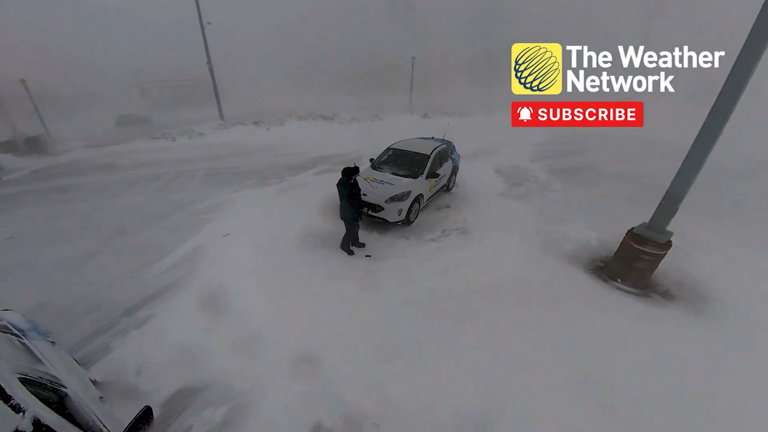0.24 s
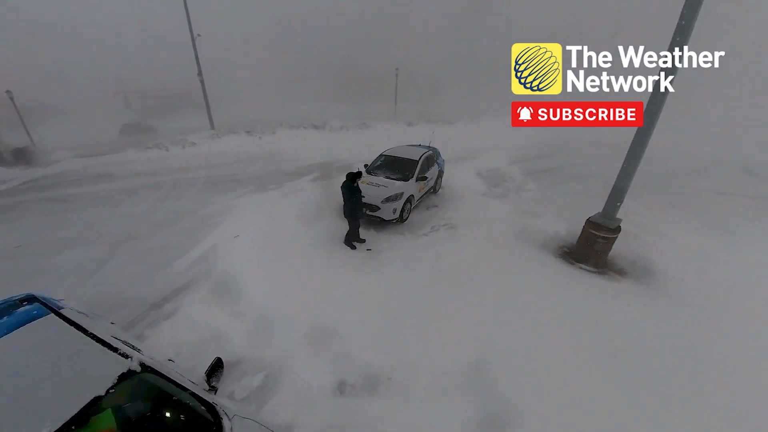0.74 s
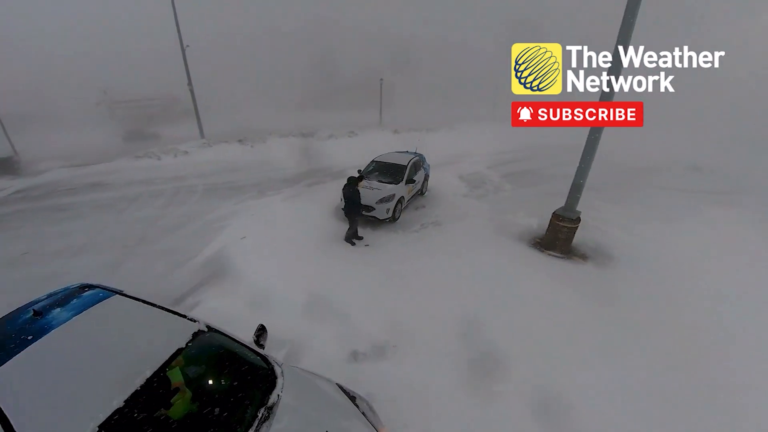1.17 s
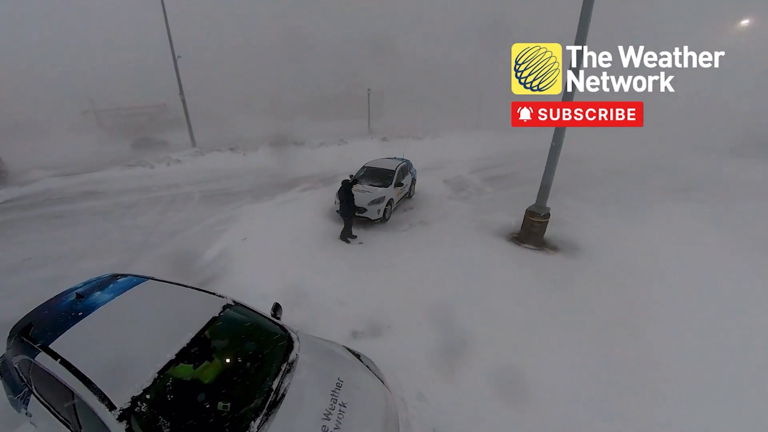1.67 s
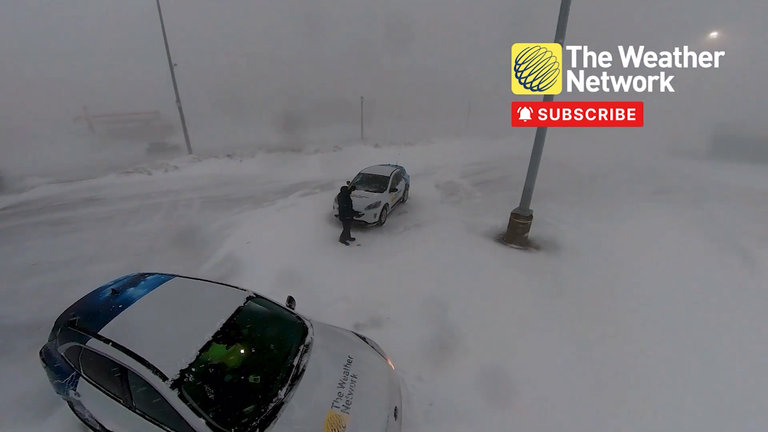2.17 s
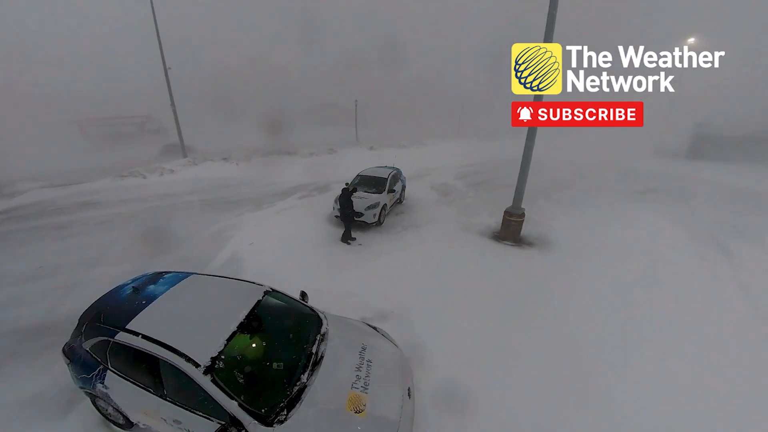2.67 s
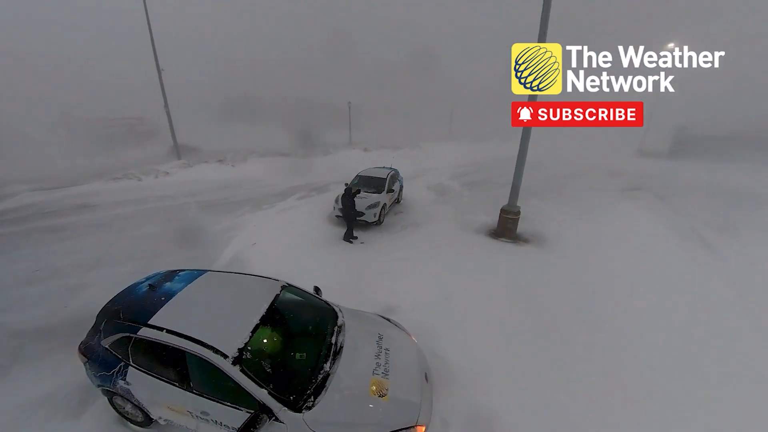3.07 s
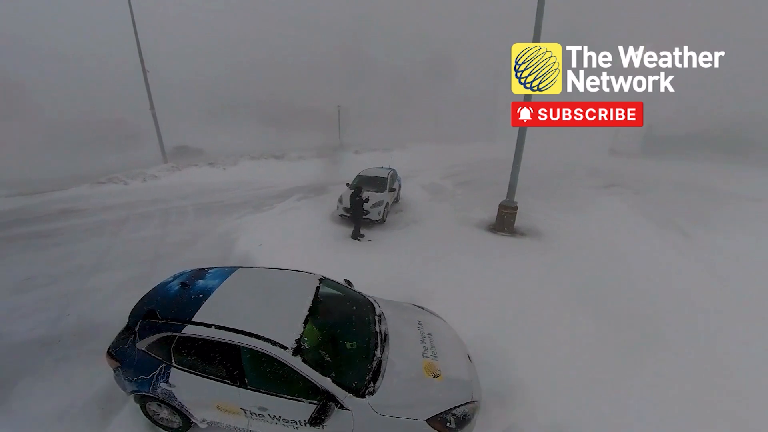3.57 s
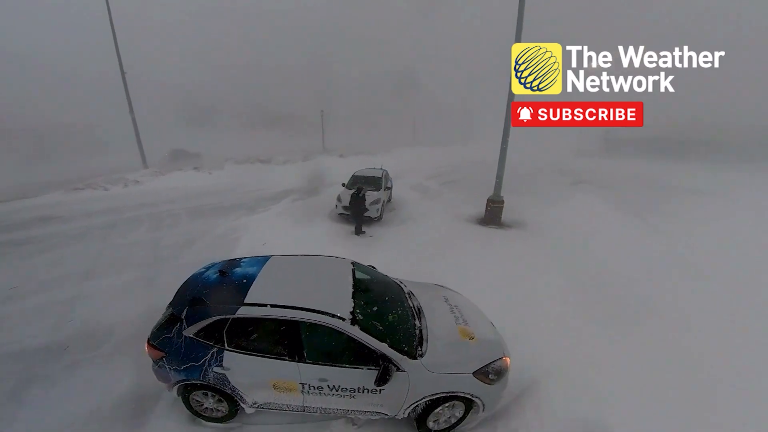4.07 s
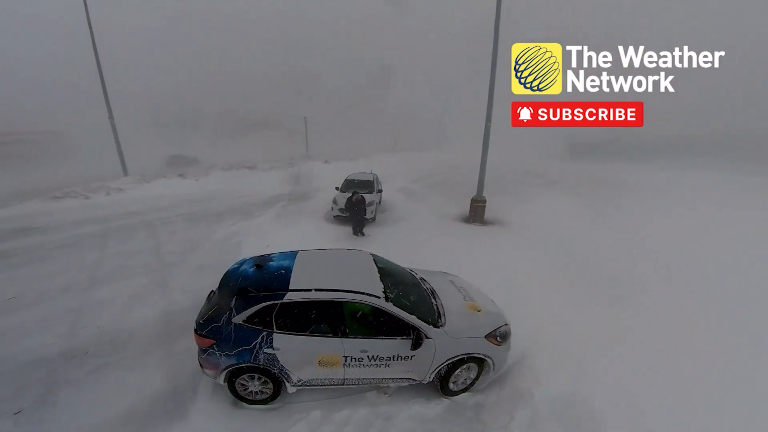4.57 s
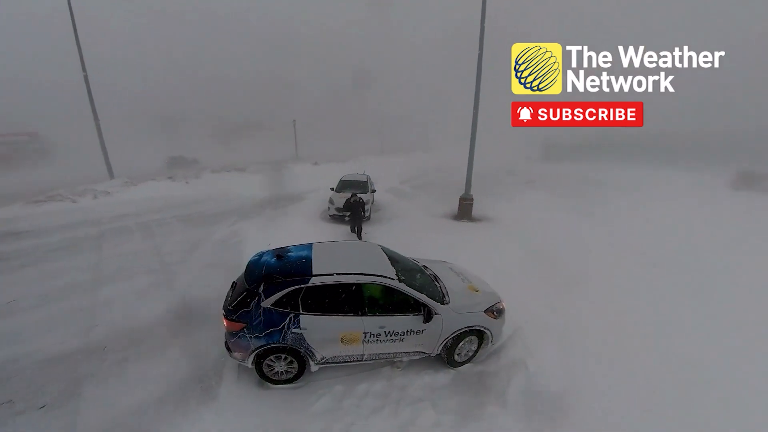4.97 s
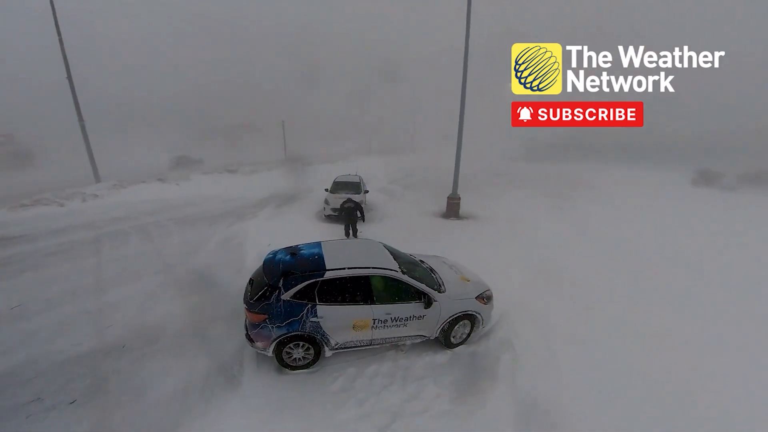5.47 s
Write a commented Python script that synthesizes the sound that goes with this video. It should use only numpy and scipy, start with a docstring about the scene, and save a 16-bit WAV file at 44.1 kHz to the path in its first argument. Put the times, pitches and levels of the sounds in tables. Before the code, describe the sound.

A blizzard over an open, snowy car park, heard from a small camera on a pole for about 5.7 seconds. Close and central, wind buffets the covered port: a deep, lumpy rumble with thuds and flaps, rising and dropping several times a second. Behind it a softer mid-low storm roar stays even and wide. A faint low hum near 90 Hz wavers, clearest around 0.5 s, returning weakly near 3 s and then practically gone. Snow grains tick brightly on the ringing housing, noticeable near 0.6, 2.3 and 2.5 s, over fine sparse patter. Blunt pops punctuate, strong around 0.5-0.6, 1.1-1.2, 2.25-2.3 and 3.4-3.7 s. From about 3.85 to 4.15 s rough puffs cluster, then more come at 4.5-4.9 s, with lower, heavier ones near 5.25-5.35 s. Ragged gusts continue to the end, with a strong surge near 5.45 s. Dull top, only a trace of hiss.

```python
"""An open car park in a blizzard, heard at a small camera on a pole.
The storm roars evenly from all around: bands of noise, partly alike on the left and right.
Something hums in the airstream, a wavering tone, and blown snow ticks on the ringing housing.
Small vortices puff across the microphone port as short noise bursts, and eddies burst as pressure pops.
Nearest of all, eddies of four sizes buffet the port: noises whose levels swell into a lumpy rumble."""
import sys
import numpy as np
from scipy import signal
from scipy.fft import rfft, irfft, next_fast_len
from scipy.io import wavfile
from scipy.ndimage import uniform_filter1d

SR = 44100
rng = np.random.default_rng(int(sys.argv[2]) if len(sys.argv) > 2 else 0)


def generate_wav(signal):
    """Clip the signal to [-1, 1] and save it as 16-bit WAV at the path in sys.argv[1]."""
    frames = np.transpose(np.atleast_2d(signal))
    scaled = np.clip(frames, -1, 1) * 32767
    pcm = np.round(scaled).astype(np.int16)
    wavfile.write(sys.argv[1], SR, pcm)


N = 252252   # length in samples


def from_db(db):
    """Turn a level in dB into a gain."""
    return np.exp(np.asarray(db) * (np.log(10) / 20))


def rms_one(x):
    """Scale a sound to an rms level of 1."""
    return x / np.sqrt(np.mean(x ** 2) + 1e-20)


def in_time(rows):
    """Read the columns of a table, time first, at every sample with straight lines between rows."""
    times, *columns = np.transpose(rows)
    return [np.interp(np.arange(N) / SR, times, column) for column in columns]


def at_hz(points, hz):
    """Read a table over frequency with straight lines on a log-frequency axis."""
    table_hz, values = np.array(points).T[:2]
    return np.interp(np.log(hz), np.log(table_hz), values)


def drift(rate_hz):
    """Slow random wandering of rms 1: noise smoothed twice by a one-pole low-pass."""
    step = 40   # computed at every 40th sample only
    r = np.exp(-2 * np.pi * rate_hz * step / SR)
    noise = rng.standard_normal(N // step + 2002)
    slow = signal.lfilter([1], [1, -2 * r, r * r], noise)[2000:]   # skip the filter's start-up
    return np.interp(np.arange(N) / step, np.arange(len(slow)), rms_one(slow))


def coloured(spectrum):
    """Noise of rms 1 with the given spectrum, falling 24 dB per octave more beyond its ends."""
    size = next_fast_len(N)
    hz = np.maximum(np.arange(size // 2 + 1) * SR / size, 1)
    lowest_hz, highest_hz = spectrum[0][0], spectrum[-1][0]
    beyond = np.maximum(np.maximum(lowest_hz / hz, hz / highest_hz), 1)
    gain = from_db(at_hz(spectrum, hz) - 24 * np.log2(beyond))
    return rms_one(irfft(rfft(rng.standard_normal(size)) * gain, size)[:N])


def steadied(x, share, span_ms):
    """Take part of the chance swell out of a narrow noise, so that it rolls evenly."""
    envelope = np.abs(signal.hilbert(x, next_fast_len(N))[:N])
    swell = uniform_filter1d(envelope, int(span_ms * SR / 1000))
    return rms_one(x / (swell + 0.16) ** np.clip(share, 0, 1))


def resonance(x, hz, width_hz):
    """Ring at one frequency: a two-pole peak of gain 1."""
    r = np.exp(-np.pi * width_hz / SR)
    b = np.array([1, 0, -1]) * (1 - r * r) / 2
    return signal.lfilter(b, [1, -2 * r * np.cos(2 * np.pi * hz / SR), r * r], x)


def filtered(order, hz, kind, x):
    """Pass a sound through a Butterworth filter."""
    return signal.sosfilt(signal.butter(order, hz, kind, fs=SR, output="sos"), x)


# Colour of the far wind: pitch_hz, relative level_db (per Hz)
ROAR_SPECTRUM = [(35, -42), (60, -26), (100, -22), (161, -9), (285, -2), (400, -3), (560, -6.5),
                 (1100, -14.5), (2180, -23.5), (3100, -32), (3970, -39.5), (4600, -47.5), (5400, -54),
                 (7000, -61.5), (9500, -95.5)]
# How alike left and right are: pitch_hz, likeness (1 the same, 0 unrelated, -1 opposite)
LEFT_RIGHT_LIKENESS = [(40, -0.6), (65, 0.36), (100, 0.94), (250, 0.6), (500, 0.58), (1000, 0.71),
                       (2000, 0.73), (4000, 0.72), (8000, 0.41)]


def roar(patchy_db, level_db):
    """Wind over ground and cars, from afar: narrow bands, each partly alike at both ports."""
    out = 0
    edges = 30 * 2 ** np.arange(0, 8.4, 1 / 5)   # five bands per octave, from 30 Hz
    white = rng.standard_normal((2, 2, N))
    together = drift(3.5)   # level wandering shared by all bands
    for k, (low, high) in enumerate(zip(edges, edges[1:])):
        # neighbouring bands take turns at two noise pairs
        mid, side = filtered(3, [low, high], "band", white[k % 2])
        hz = np.sqrt(low * high)
        alike = np.clip(at_hz(LEFT_RIGHT_LIKENESS, hz), -1, 1)
        gain = from_db(at_hz(ROAR_SPECTRUM, hz) + patchy_db * (1.1 * together + drift(21.0)))
        opposite = side * [[1], [-1]]
        out = out + gain * (np.sqrt(1 + alike) * mid + np.sqrt(1 - alike) * opposite)
    return from_db(level_db) * rms_one(out)


# Course of the low hum, before its waver: start_s, pitch_hz, level_db
HUM_COURSE = [(0, 95.44, -45.5), (.3, 95.09, -37), (.5, 96.4, -31), (.7, 94.72, -38), (1.1, 92.35, -37.5),
              (1.5, 89.14, -47), (2.2, 94.8, -43), (2.9, 88.75, -37.5), (3.5, 86.3, -58), (5.72, 86.5, -56)]


def hum(octave_db, waver_hz):
    """A tone in the airstream with its octave, both wavering at random in pitch and level."""
    hz, level_db = in_time(HUM_COURSE)
    phase = 2 * np.pi * np.cumsum(hz + waver_hz * drift(9.0)) / SR
    octave = from_db(octave_db + 1.0 * drift(22.0)) * np.sin(2 * phase)
    return from_db(level_db + 3.5 * drift(21.0)) * (np.sin(phase) + octave)


# Large snow grains: start_s, level_db (before the ring), brightness_db (upper rings against lower)
LARGE_GRAINS = [(0.0732, -62, 5), (0.093, -65, 4), (0.318, -58.5, -3), (0.327, -61, 3), (0.575, -47.5, -2),
                (0.615, -57.5, 9.5), (1.1119, -60, -2), (1.1134, -70, 8), (1.2117, -56, -1),
                (1.2143, -60, 11.5), (1.31, -75, -14), (1.477, -70, 0), (1.499, -69, -8), (1.5416, -67, 0),
                (1.5722, -66, 6), (1.6392, -66, 4), (1.673, -69, -7), (1.7591, -65, 0), (1.902, -75, -5),
                (2.015, -73, -14.5), (2.2538, -63, 3), (2.295, -55, 0), (2.3196, -51.5, 2.5),
                (2.4645, -62, -2), (2.5399, -49.5, -0.5), (2.8846, -65.5, 11), (3.108, -69, 0),
                (3.336, -66, 4), (3.368, -57.5, 3), (3.5688, -69, 4), (3.6622, -65, 5.5), (3.71, -61, -4),
                (3.725, -59, 0), (4.082, -56.5, 10), (4.2433, -62, 4), (4.69, -71, -3), (4.7581, -58, 6),
                (5.41, -68, 3)]
# Rings of the housing: pitch_hz, width_hz, level_db, share of a grain's brightness (may be negative)
HOUSING_RINGS = [(2920, 1300, 6.5, -1.8), (5900, 1500, -1, -0.74), (6560, 1500, 0, 1)]


def snow(fine_per_s, fine_db):
    """Large grains scratch the ringing housing for 1 ms; fine grains patter as single clicks."""
    start_s, level_db, bright_db = np.transpose(LARGE_GRAINS)
    length = 40   # samples in a scratch
    grit = 0.23 * rng.standard_normal((len(LARGE_GRAINS), length)) * np.hanning(length)
    grit[:, 12] += 2   # the first contact
    grit = grit / grit.std(axis=1, keepdims=True)
    where = (start_s * SR).astype(int)[:, None] + np.arange(length)

    sizes = from_db(fine_db + 2.4 * np.minimum(rng.exponential(1, N), 3.0)) * rng.choice([-1, 1], N)
    fine = sizes * (rng.random(N) < fine_per_s / SR) + 1e-18
    out = 0
    for hz, width_hz, ring_db, share in HOUSING_RINGS:
        hits = fine.copy()
        hits[where] += from_db(level_db + share * bright_db)[:, None] * grit
        out = out + from_db(ring_db) * resonance(resonance(hits, hz, width_hz), hz, width_hz)
    return out


# Short rough puffs: time_s (a quarter of the way into the puff), peak level_db, centre pitch_hz
PUFF_LIST = [(0.151, -32, 400), (1.305, -36.5, 443), (2.366, -32, 423), (3.846, -38, 320),
             (3.867, -43, 386), (3.883, -31, 440), (3.89, -38, 860), (3.958, -32, 550), (3.992, -40, 700),
             (4.012, -37, 795), (4.02, -44, 890), (4.053, -50, 1380), (4.098, -46, 1000), (4.068, -37, 774),
             (4.084, -43, 1000), (4.124, -40.5, 800), (4.136, -41, 351), (4.035, -40, 923),
             (4.543, -48, 480), (4.563, -31.5, 376), (4.642, -31.5, 332), (4.652, -28, 425),
             (4.656, -38.5, 934), (4.718, -35.5, 244), (4.827, -41, 512), (4.845, -31, 349),
             (4.879, -44, 865), (5.25, -26.5, 272), (5.328, -24, 211.6), (5.599, -31.5, 422),
             (5.669, -52, 368)]


def puffs(base_ms, cycles):
    """A few uneven, dull cycles where a small vortex is dragged across the port."""
    out = np.zeros(N + 4000)
    white = rng.standard_normal((len(PUFF_LIST), 4000))
    for (time_s, level_db, hz), noise in zip(PUFF_LIST, white):
        length_ms = np.clip(base_ms + cycles * 1000 / hz, 4, 40)   # lower puffs last longer
        size = int(length_ms * SR / 1000)
        dull = filtered(4, 1.14 * hz, "low", noise)
        band = resonance(resonance(dull, hz, hz), hz, hz)   # each peak is as wide as its centre pitch
        burst = band[-size:] * np.hanning(size)
        start = int(time_s * SR - 0.2494 * size)
        out[start:start + size] += from_db(level_db) * burst / np.abs(burst).max()
    return out[:N]


def pulses(rows):
    """Pressure humps from rows: time_s, height (gain), half width_ms, suction, rebound."""
    before, length = 400, 1200   # samples ahead of the push, and in all
    out = np.zeros(N + length)
    ms = np.arange(-before, length - before) / SR * 1000
    taper = signal.windows.tukey(length, .4)
    after = np.maximum(ms, 0)
    # the air in the port swings back at 85 Hz, setting in softly
    swing = -np.sin(2 * np.pi * 85.0 * after / 1000) * np.exp(-after / 7.0)
    swing = swing * (1 - np.exp(-(after / 2.5) ** 2))
    for time_s, height, width_ms, suction, rebound in rows:
        width_ms = np.clip(width_ms, .08, 2)
        push = (1 + (ms / width_ms) ** 2 / 2) ** -1.6
        dip = (1 + (ms / width_ms + 3.52) ** 2 / 2) ** -1.6   # suction just ahead of the push
        shape = push - np.clip(suction, 0, 1.5) * dip + np.clip(rebound, 0, 6) * swing
        start = int(np.clip(time_s * SR, 0, N - 1))
        out[start:start + length] += height * taper * shape
    return out[before:N + before]


# Strong pops: time_s of the push, level_db of the push before the cover softens it,
# half width_ms (at least 0.08 is used), suction ahead (0 to 1.5),
# slow rebound (limited to 0 to 6, so below 0 means none), housing knock_db against the push
STRONG_POPS = [(0.319, -37, .09, 0, 2.5, -4), (0.3278, -30.5, 0.044, 0, -2.5, -17),
               (0.37, -40.5, 0.069, 0, -2, -13), (0.154, -34, 0.31, 0.3, 0.5, -13),
               (.517, -21, 0.12, 0, 2, -23), (0.575, -18.5, 0.13, 0.1, -1.5, -17),
               (0.6152, -28, 0.12, 0, -1, -1), (0.6464, -34, 0.14, 0.1, 1.5, -5),
               (1.092, -33, 0.2, 1.5, -1.5, -8), (1.11275, -25, 0.18, 0, 0, 8),
               (1.1144, -21.5, 0.155, 1.5, 0, -5.5), (1.2153, -20, 0.23, 1.12, 0, 0),
               (2.5405, -21.5, 0.29, 0, 1, -8), (2.5424, -32, 0.35, 1.5, 0, -25),
               (1.2116, -37, 0.062, 0.4, 10, -9), (1.641, -31, 0.05, 1.07, -6, -13),
               (1.6445, -23, 0.14, 0.1, -2, -18), (2.051, -33, 0.18, 0.8, -2, -9),
               (2.243, -19, 0.3, 0, 0.5, -12), (2.275, -35, 0.13, 0.3, -1.5, -2),
               (2.2955, -15.5, 0.17, 0.02, 0.9, -15), (3.3681, -22, 0.32, 0.35, 3.5, -6),
               (3.573, -21.5, 0.28, 0, -2.5, -18), (3.6662, -21.5, 0.23, 0, 1.7, -22),
               (3.724, -21.5, 0.33, 0.66, 2.5, -10), (3.7997, -29, 0.24, 0.5, -1.5, -8),
               (3.872, -23, 0.37, 1, 1.5, -14), (3.96, -33, 0.35, 0.9, 7, -7),
               (4.424, -27, 0.3, 0.9, 2, -11.5), (4.479, -24.5, 0.56, 1.3, -1.5, -6),
               (4.519, -30, 0.35, 1.3, 0, -15), (4.569, -27, 0.3, 1.3, 0.5, -10),
               (4.7595, -25, 0.3, 0.1, 1.5, -12), (4.658, -27.5, 0.5, 0.86, 1.5, -13),
               (4.71, -20, 0.4, 0, 1, -3), (5.062, -23, 0.45, 0, -1, -13), (5.292, -31, 0.52, 1.34, 0, -13),
               (5.3949, -30.5, 0.33, 1.1, 5, -12), (5.603, -33.5, 0.43, 0.1, 4.5, -15),
               (5.669, -30, 0.44, 0, 3, -8)]


def pops(small_per_s, small_db):
    """Eddies bursting right at the port: the strong ones listed, many weak ones by chance."""
    knock_lag_ms = 0.6   # the housing answers this late
    strong, knocks = [], []
    for time_s, level_db, width_ms, suction, rebound, knock_db in STRONG_POPS:
        strong.append((time_s, from_db(level_db), width_ms, suction, rebound))
        knocks.append((time_s + knock_lag_ms / 1000, from_db(level_db + knock_db), width_ms, suction, 0))

    luck = rng.random((400, 6))
    times = np.cumsum(-np.log(luck[:, 0])) / small_per_s   # random waits between weak pops
    direction = np.where(luck[:, 4] < .7, 1, -1)   # most push, some pull
    heights = from_db(small_db - 0.86 * np.log(luck[:, 1] + .02)) * direction
    widths_ms = 0.065 + 1.7 * luck[:, 2]
    weak = np.transpose([times, heights, widths_ms, luck[:, 3], luck[:, 5]])[times < N / SR]

    pressure = pulses(strong) + pulses(weak)
    knocking = resonance(pulses(knocks), hz=1500, width_hz=400)
    rounded = filtered(2, 2600.0, "low", pressure + knocking)   # the cover rounds the tip
    return filtered(1, 90.0, "high", rounded)   # the pressure leaks away


# Swells and short lulls of the low buffeting: start_s, level_db
GUST_LEVEL = [(0.0, -25), (0.03, -38), (0.05, -40), (0.19, -30), (0.25, -42.5), (0.29, -37.5), (0.54, -35),
              (0.57, -33), (0.62, -28.5), (0.68, -38), (0.73, -33), (0.765, -38.5), (0.79, -31.5),
              (0.855, -37), (0.89, -32.5), (1.19, -34), (1.26, -41), (1.3, -38), (1.34, -33.5),
              (1.53, -29.5), (1.56, -35), (1.69, -29.5), (1.75, -39), (1.78, -25), (1.81, -36),
              (1.89, -29.5), (1.93, -38.5), (2.05, -35.5), (2.13, -32.5), (2.19, -29.5), (2.21, -34.5),
              (2.24, -30.5), (2.37, -37), (2.42, -29.5), (2.47, -39), (2.52, -35.5), (2.63, -43),
              (2.66, -27), (2.71, -30.5), (2.79, -34.5), (2.85, -33), (2.98, -34), (3.09, -33.5),
              (3.1, -29), (3.23, -32), (3.26, -40.5), (3.33, -30), (3.41, -33), (3.71, -34.5),
              (3.73, -33.5), (3.79, -47), (3.84, -31), (3.89, -32.5), (3.94, -46), (3.95, -34.5),
              (4.13, -30.5), (4.16, -38), (4.22, -33), (4.32, -36), (4.35, -30), (4.43, -31.5), (4.44, -37),
              (4.49, -34), (4.76, -38.5), (4.89, -29.5), (5.13, -46), (5.16, -37), (5.23, -36.5),
              (5.26, -29.5), (5.38, -44.5), (5.43, -28.5), (5.46, -25.5), (5.53, -48), (5.61, -31.5),
              (5.72, -42.5)]
# Flow at the port, from even rolling to ragged, and the finest eddies:
# start_s, raggedness (0 to 1), flutter level_db (before the gusts sway it)
FLOW = [(0, 0.4, -47), (.5, 0, -52), (.85, 0.71, -56.5), (1.3, 0, -52.5), (2.3, 0.07, -53.5),
        (2.7, 0.25, -54), (3.15, 0.64, -52.5), (3.7, 0.74, -52.5), (3.9, 0.33, -46.5), (4.12, 0.36, -48.5),
        (4.3, 1, -52), (4.62, 1, -47.5), (4.95, 0.84, -48), (5.3, 0.5, -52.5), (5.5, 0.4, -49.5),
        (5.72, 0.14, -43)]
# Colours of the four eddy sizes, largest first, each: pitch_hz, relative level_db (per Hz)
DEEP_SPECTRUM = [(20, -5), (35, -9), (55, 6), (75, -8.5), (110, -19)]
THUD_SPECTRUM = [(55, -19.5), (78, -2), (105, -7), (135, -11.5), (190, -27.5)]
FLAP_SPECTRUM = [(105, -20.5), (145, 2), (200, -3), (270, -9.5), (380, -32)]
FLUTTER_SPECTRUM = [(200, -8), (300, 0.5), (600, -9), (1200, -23.5), (2400, -48), (4800, -84)]


def buffet():
    """Large eddies roll smoothly, small ones come in lumps that all sizes share in part."""
    (gust_db,), (ragged, flutter_db) = in_time(GUST_LEVEL), in_time(FLOW)
    mean_db = gust_db.mean()
    swing_db = gust_db - mean_db
    # dB against the mean gust level, dB added in ragged flow, share of the gust swing followed
    deep_db = mean_db - 5 + 3.3 * ragged + 0.89 * swing_db
    thud_db = mean_db - 4.5 - 0.71 * ragged + 1.26 * swing_db
    flap_db = mean_db - 8 - 7.5 * ragged + 0.73 * swing_db
    flutter_db = flutter_db + 0.43 * swing_db

    # random level changes in dB: lumps and thumps are shared, the last drift is each size's own
    lumps = drift(20.0)
    thumps = ragged * drift(4.7)   # extra lumpiness in ragged flow
    deep_db = deep_db + thumps + 0.16 * lumps + 0.55 * drift(12.0)
    thud_db = thud_db + thumps + 1.5 * lumps + 0.24 * drift(14.0)
    flap_db = flap_db + thumps + 1.8 * lumps + 1.3 * drift(6.4)
    flutter_db = flutter_db + thumps + 2.4 * lumps + 1.3 * drift(76.0)

    deep = from_db(deep_db) * steadied(coloured(DEEP_SPECTRUM), share=0.66, span_ms=140.0)
    thud = from_db(thud_db) * steadied(coloured(THUD_SPECTRUM), share=1.0, span_ms=37.0)
    flap = from_db(flap_db) * steadied(coloured(FLAP_SPECTRUM), share=0.44, span_ms=49.0)
    flutter = from_db(flutter_db) * coloured(FLUTTER_SPECTRUM)
    return deep + thud + flap + flutter


def scene():
    """What happens at the port is heard alike on both channels; the far roar is wide."""
    far = roar(patchy_db=0.58, level_db=-47.5)
    port = hum(octave_db=-9.5, waver_hz=4.937) + snow(fine_per_s=32.0, fine_db=-65.0)
    port = port + puffs(base_ms=3.78, cycles=4.44) + pops(small_per_s=16.0, small_db=-52.0)
    return far + port + buffet()


def record(dry):
    """The covered port dulls the top octave, the circuit adds a trace of hiss, the top is cut."""
    dulled = filtered(6, 7900.0, "low", dry)
    # mostly the same hiss on both channels, plus a little of each channel's own
    hiss = from_db(-106) * (rng.standard_normal(N) + .3 * rng.standard_normal(dry.shape))
    top_cut = signal.cheby2(12, 70, 15700, fs=SR, output="sos")   # 70 dB down from 15700 Hz up
    return signal.sosfilt(top_cut, dulled + hiss)


dry = scene()
out = record(dry)
generate_wav(out)
```